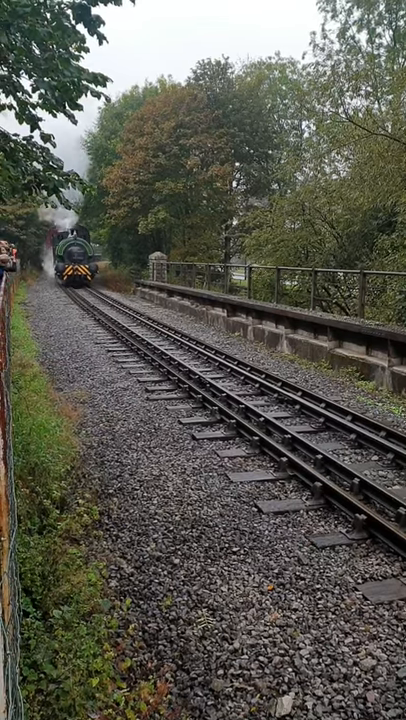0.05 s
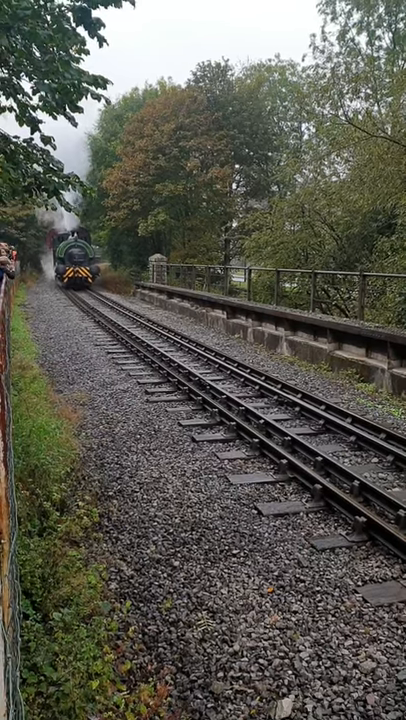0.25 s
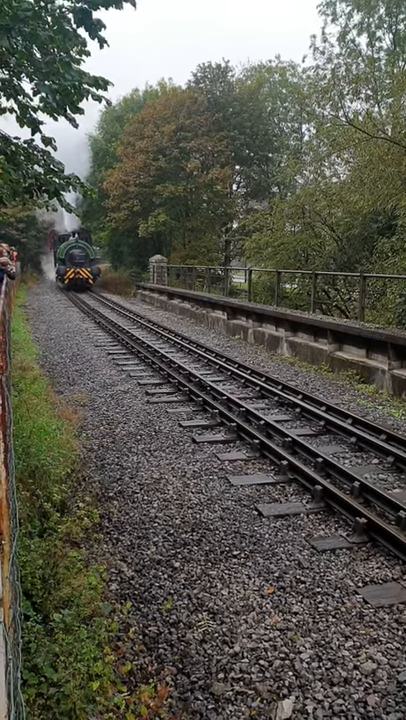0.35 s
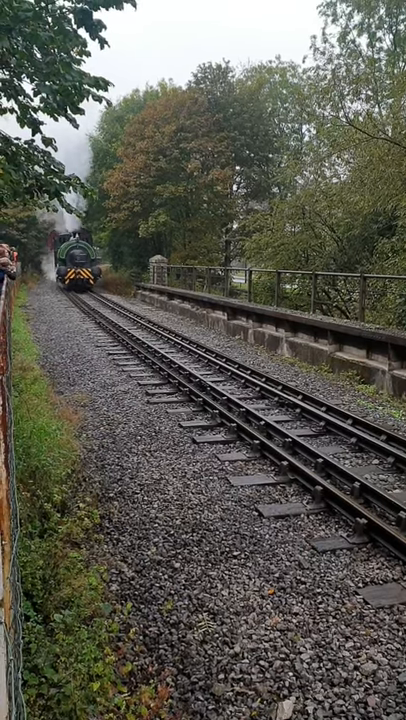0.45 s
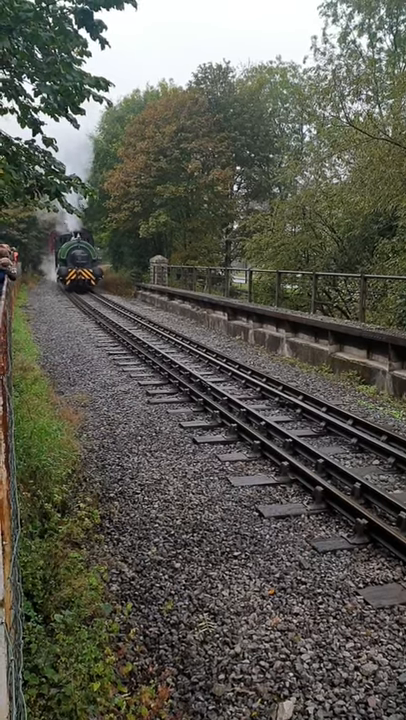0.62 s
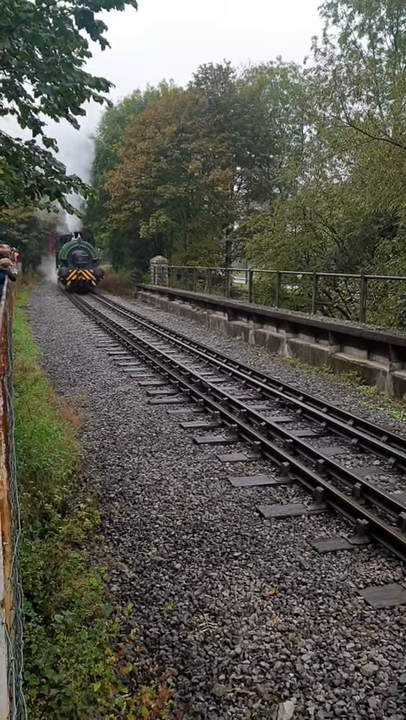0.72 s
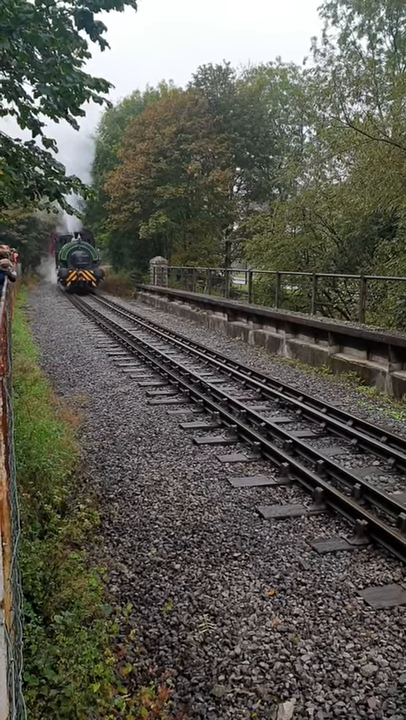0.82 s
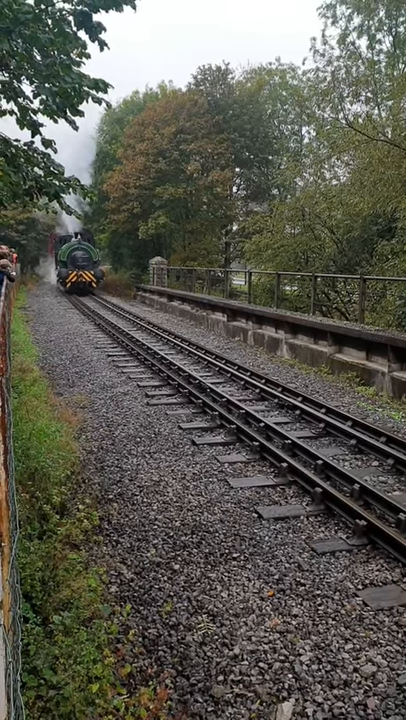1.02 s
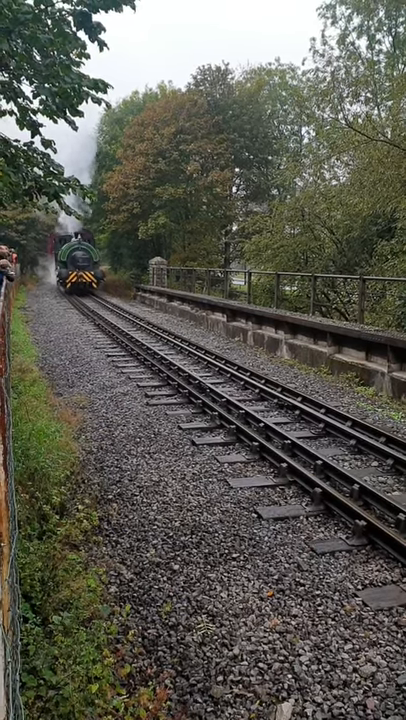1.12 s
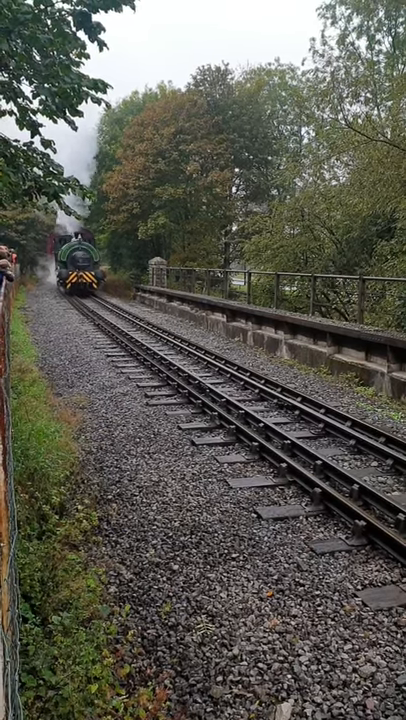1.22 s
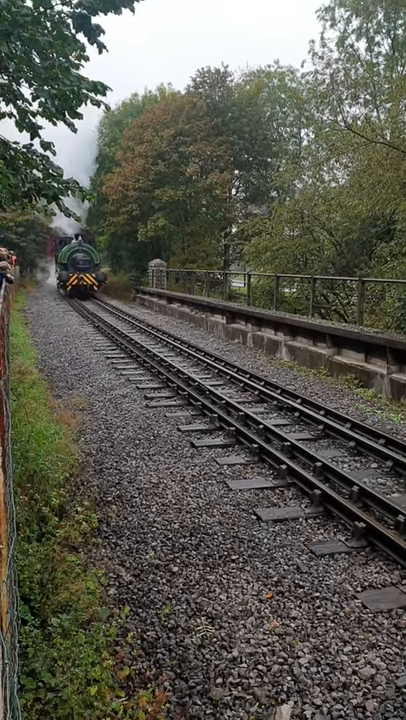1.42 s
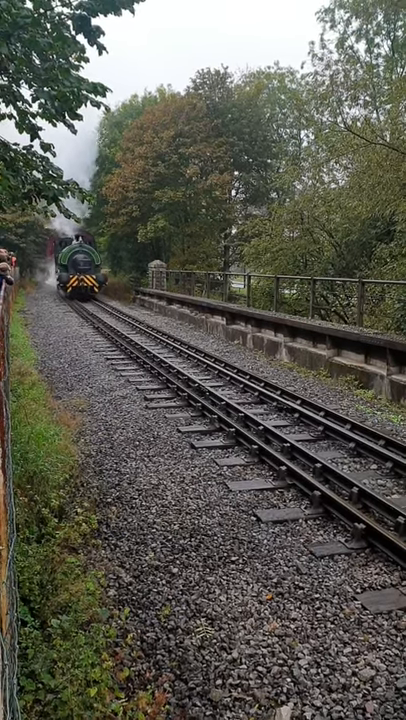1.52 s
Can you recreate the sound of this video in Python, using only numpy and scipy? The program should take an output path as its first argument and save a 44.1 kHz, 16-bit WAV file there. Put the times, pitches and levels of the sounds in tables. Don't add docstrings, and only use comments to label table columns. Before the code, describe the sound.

Two breathy steam train whistle toots ring out from down the track, with hiss and woodland echo

```python
import sys
import numpy as np
from scipy import signal
from scipy.fft import rfft, irfft
from scipy.io import wavfile
from scipy.ndimage import uniform_filter1d, minimum_filter1d

SR = 44100
rng = np.random.default_rng(int(sys.argv[2]) if len(sys.argv) > 2 else 0)


def to_wav(sig):
    pcm = np.clip(np.atleast_2d(sig), -1, 1) * 32767
    pcm = np.round(pcm).astype(np.int16)
    wavfile.write(sys.argv[1], SR, pcm.T)


def ratio(d):
    e = np.asarray(d, float) / 20
    return 10 ** e


N = 68355
LEAD_S = .000083
DUCK_START_S, DUCK_S = 0.28, 0.063


def evened(x):
    return x / np.sqrt(np.mean(x ** 2) + 1e-20)


def read(points, hz):
    f, value = np.transpose(points)
    return np.interp(np.log(hz + 1), np.log(f + 1), value)


def drift(rate_hz):
    step = 32
    low_pass = signal.butter(2, rate_hz, fs=SR / step)
    slow = signal.lfilter(*low_pass, rng.standard_normal(N // step + 400))[398:]
    return np.interp(np.arange(N) / step, np.arange(len(slow)), evened(slow))


def wavering(width_hz):
    return drift(width_hz) + 1j * drift(width_hz)


def port_difference(left, hz):
    return ratio(read(left, hz) / 2) * np.exp(1j * np.pi * hz * LEAD_S)


def ports(x, left):
    side = port_difference(left, np.fft.rfftfreq(N, 1 / SR))
    return irfft(rfft(x) * np.array([side, 1 / side]), N)


def hiss(colour, same, left, patchy_db):
    frames, hz = N // 256 + 5, np.fft.rfftfreq(1024, 1 / SR)
    a, b, c, d, patches = rng.standard_normal((frames, 513, 5)).T
    patches = uniform_filter1d(patches, size=12, axis=0)
    patches = evened(uniform_filter1d(patches, size=10, axis=1))
    share = np.clip(read(same, hz), -1, 1)[:, None]
    side = port_difference(left, hz)[:, None]
    one = a + 1j * b
    other = share * one + np.sqrt(1 - share ** 2) * (c + 1j * d)
    z = np.array([one * side, other / side])
    z *= ratio(read(colour, hz)[:, None] + patchy_db * patches)
    out = signal.istft(z, nperseg=1024, noverlap=768)[1][:, :N]
    return out / np.sqrt(np.mean(out.mean(0) ** 2))


# f/Hz, level/dB per Hz
AIR = [(150, -44), (500, -1), (1100, 0), (2200, -9.5), (5200, -5), (8400, -8.5), (11000, -9.5),
       (15000, -11)]
# f/Hz, likeness/-1 to 1
AIR_SAME = [(60, -0.53), (180, -0.64), (530, 0.94), (1580, 0.11), (4690, -0.0085), (13900, 0.54)]
# f/Hz, level/dB
AIR_LEFT = [(60, 4), (150, 3.6), (370, 7.9), (910, 5.1), (2270, 9.7), (5620, 12.3), (13900, 0.67)]


def open_air():
    level_db, swell_db = -34.5, .8
    return ratio(level_db + swell_db * drift(4.2)) * hiss(AIR, AIR_SAME, AIR_LEFT, patchy_db=0.0)


# f/Hz, level/dB per Hz
RUMBLE = [(12, -52), (20, -8), (41, 3), (65, 6), (97, 0), (150, -11.5), (193, -2), (236, -9.5),
          (400, -19.5), (520, -46), (880, -120)]


def exhaust_roll():
    level_db, lumps_db, eases_db = -34.5, 1.5, -3
    t, hz = np.arange(N) / SR, np.fft.rfftfreq(N, 1 / SR)
    roll = irfft(rfft(rng.standard_normal(N)) * ratio(read(RUMBLE, hz)), N)
    ease_db = eases_db * np.clip((t - DUCK_START_S) / DUCK_S, 0, 1)
    return ratio(level_db + ease_db + lumps_db * drift(11.3)) * evened(roll)


def hum(hz, width_hz, db):
    turning = np.exp(2j * np.pi * hz * np.arange(N) / SR)
    return ratio(db) * (wavering(width_hz / 2) * turning).real


# t/s, f/Hz, level/dB
THUDS = [
    (0.197, 62.6, -24.5),
    (.555, 64, -28.5),
    (1.053, 62, -20),
]


def thuds():
    t, length_s = np.arange(N) / SR, 0.061
    out = np.zeros(N)
    for s, thud_hz, db in THUDS:
        u = np.clip((t - s) / length_s, 0, 1)
        out += ratio(db) * np.sin(np.pi * u) ** 2 * np.sin(2 * np.pi * thud_hz * (t - s))
    return out


def engine():
    hums = hum(181.6, 17, -48) + hum(62, 16.7, -39)
    return ports(exhaust_roll() + hums + thuds(), AIR_LEFT)


# t/s, pitch f/Hz, tone level/dB, jet level/dB
BLASTS = [
    [(.227, 880, -60, -36), (.24, 960, -16, -13.5), (.285, 1021, -16.5, -1.5), (.315, 1037, -4.5, 3),
     (.4, 1058, -5, 4), (.48, 1085, -17, 5), (.585, 1079, -6.5, 5), (.603, 995.8, -9, 3.5),
     (.618, 907, -25.5, -10)],
    [(.858, 901, -72, -25), (.874, 980.5, -9.5, -8), (.905, 1050, -17.5, 5.5), (.928, 1085, -3, 6),
     (.98, 1086, -20.5, 6.5), (1.025, 1089, -1, 7), (1.104, 1074, -8, 5), (1.113, 999, -12, 1.5),
     (1.13, 894, -25.5, -14)],
]


def valve():
    rows, t = np.vstack(BLASTS), np.arange(N) / SR
    is_open = sum((t > b[0][0]) & (t < b[-1][0] + .01) for b in BLASTS) * 1.
    curves = [np.interp(t, rows[:, 0], column) for column in rows.T[1:]]
    return uniform_filter1d(np.array(curves + [is_open]), size=150, axis=1)


# f/Hz, level/dB per Hz
JET = [(250, -12.5), (700, -7.5), (3500, -1.5), (6500, -2.5), (8400, -4.5), (10800, 0), (13000, 2),
       (15000, -21)]
# f/Hz, likeness/0 to 1
JET_SAME = [(500, 0.94), (2500, 0.16), (6000, .3), (11000, 0.49)]
# f/Hz, level/dB
JET_LEFT = [(500, 7.5), (3000, 5), (6000, 12.5), (9000, -2), (13000, 4.5)]


def steam_jet(jet_db, is_open):
    return ratio(-30.5 + jet_db) * is_open * hiss(JET, JET_SAME, JET_LEFT, patchy_db=0.5)


OVERTONES_DB = [-1.5, -17.5, -17.5, -16.5, -25, -43]


def whistle(hz, tone_db):
    full_hz, overtone_sag_db = 1045, 3000.
    overtone_follow, overtone_base_db = 0.21, -10
    wobble, wobble_hz = 0.0031, 13.7
    flutter_db, overtone_flutter_db, flutter_hz = 2.32, .5, 17.4
    breath_db, breath_width_hz = -14.5, 17.7
    weak_breath_db = 98
    shortfall = np.maximum(1 - hz / full_hz, 0)
    turns = 2 * np.pi * np.cumsum(hz * (1 + wobble * drift(wobble_hz))) / SR
    out = np.zeros(N)
    for k, db in enumerate(OVERTONES_DB):
        level_db, skirt_db = tone_db, breath_db
        if k == 0:
            skirt_db = breath_db + weak_breath_db * shortfall
        else:
            level_db = overtone_base_db + overtone_follow * (tone_db - overtone_base_db)
        sag_db = -overtone_sag_db * k * shortfall ** 2
        flutter = (flutter_db + overtone_flutter_db * min(k, 2)) * drift(flutter_hz)
        skirt = ratio(skirt_db) * np.sqrt(k + 1) * wavering(breath_width_hz * (k + 1))
        partial = ((1 + skirt) * np.exp(1j * (k + 1) * turns)).real
        out += ratio(db + level_db + sag_db + flutter) * partial
    return np.sqrt(2) * out


# f/Hz, level/dB
TONE_LEFT = [(1000, 10.5), (2100, 7.5), (3200, 16), (4300, 12), (6000, 12.5)]


def direct_tone(tone):
    return ports(tone, TONE_LEFT)


# delay t/s, left level/dB, right level/dB
ECHOES = [
    (.052, -18, -14),
    (.078, -20, -15),
    (.108, -19, -15),
    (.135, -16, -13),
    (.152, -15, -14),
    (.171, -15, -13),
    (.31, -20, -16),
]


def echoes(x):
    hz = np.fft.rfftfreq(2 * N, 1 / SR)
    paths = 0
    for s, left_db, right_db in ECHOES:
        paths = paths + ratio(np.array([[left_db], [right_db]])) * np.exp(-2j * np.pi * hz * s)
    return irfft(rfft(x, 2 * N) * paths, 2 * N)[:, :N]


# f/Hz, time to fall by 60 dB t/s
TREES = [(500, 2.46), (1050, 1.43), (2200, 1.65), (3300, 1.48), (4400, 0.93), (8000, 0.9), (12000, 0.31)]


def trees(x):
    spacing = 20
    taps = np.zeros((2, N))
    starts = np.arange(400, N - spacing, spacing)
    places = starts + rng.integers(0, spacing, (2, len(starts)))
    np.put_along_axis(taps, places, rng.choice([-1., 1.], (2, len(starts))), 1)
    hz, t, z = signal.stft(taps, SR, nperseg=256)
    tail = signal.istft(z * ratio(-60 * t / read(TREES, hz)[:, None]), SR, nperseg=256)[1]
    tail /= np.sqrt(read(TREES, 1050.) / (6 * np.log(10)) * SR / spacing)
    return signal.fftconvolve(x, tail, axes=1)[:, :N]


def scene():
    trees_db, trees_left_db, jet_trees_db = -1.5, 8, -2
    background = open_air() + engine()
    hz, tone_db, jet_db, is_open = valve()
    jet = steam_jet(jet_db, is_open)
    tone = is_open * whistle(hz, tone_db)
    near = direct_tone(tone)
    tail_gain = ratio(trees_db + np.array([[.5], [-.5]]) * trees_left_db)
    far = tail_gain * trees(np.array([tone, tone]))
    return background + jet + near + echoes(near) + far + ratio(jet_trees_db) * trees(jet)


def top_cut(x):
    return signal.sosfilt(signal.butter(12, 14530, fs=SR, output="sos"), x)


NOTCH_DB = [
    [-16],
    [-10],
]


def record(dry):
    notch_hz, notch_width_hz, duck_db, ceiling = 8600, 700, -12, .97
    hz, t = np.fft.rfftfreq(N, 1 / SR), np.arange(N) / SR
    dip = np.exp(-((hz - notch_hz) / notch_width_hz) ** 2)
    heard = irfft(rfft(dry) * ratio(np.array(NOTCH_DB) * dip), N)
    heard = heard * ratio(duck_db * np.clip((t - DUCK_START_S) / DUCK_S, 0, 1))
    room_left = np.minimum(ceiling / (abs(heard).max(0) + 1e-9), 1)
    limit = uniform_filter1d(minimum_filter1d(room_left, size=441), size=441)
    return top_cut(heard * limit)


dry = scene()
out = record(dry)
to_wav(out)
```